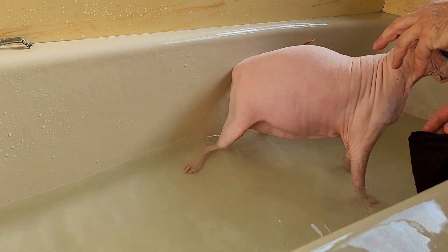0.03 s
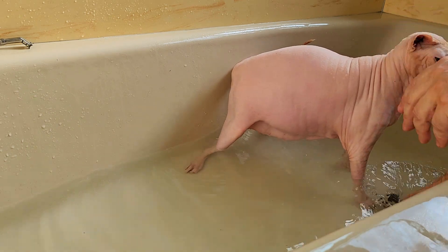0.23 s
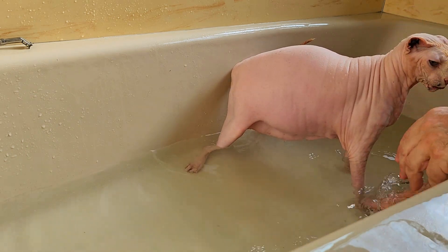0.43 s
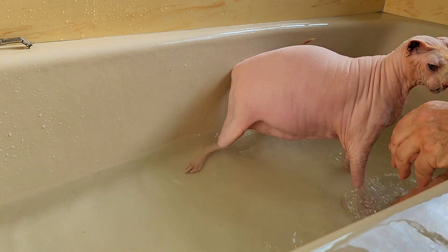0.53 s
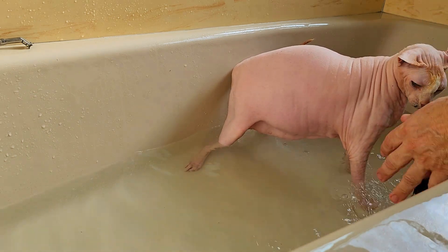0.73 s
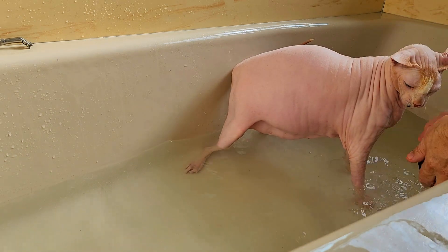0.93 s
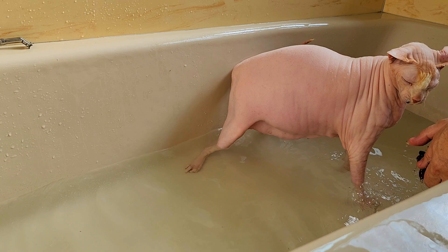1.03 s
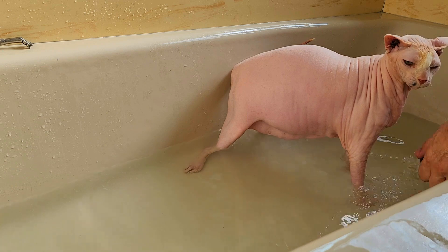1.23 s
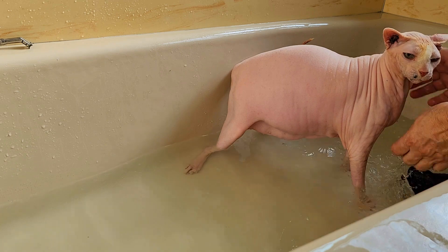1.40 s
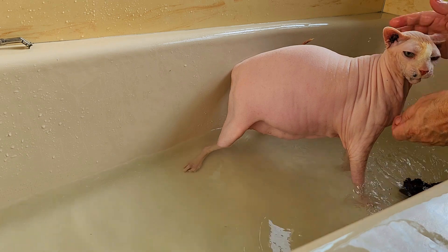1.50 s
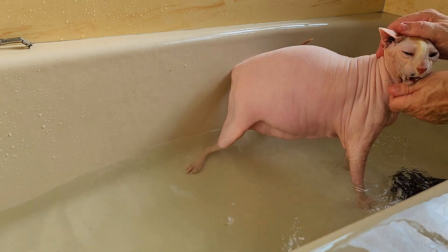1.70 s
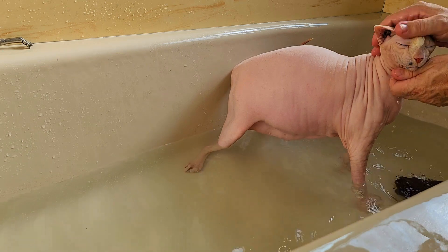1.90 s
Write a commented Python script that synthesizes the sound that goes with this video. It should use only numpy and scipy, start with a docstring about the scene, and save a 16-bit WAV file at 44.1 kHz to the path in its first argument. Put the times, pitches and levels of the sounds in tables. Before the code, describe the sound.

Close stereo pickup of shallow water in a bathtub: small drips and spray, a busy bubbling slosh, scattered drops, a second short bright splash, then near quiet with bathroom echo and low room rumble.

```python
"""A faint plop and a wisp of spray come first, over a low room rumble, as a hand and a cat's legs
stir shallow bathwater close by. Spray is tiny pings and hiss; drops are short bursts of noise.
Big air pockets plop and glug as dying tones with a climbing pitch, and small bubbles swarm the same way.
The tub booms softly in low tones, and echoes made of fading noise give the small hard bathroom."""
import sys
import numpy as np
from scipy import signal
from scipy.fft import rfft, irfft
from scipy.io import wavfile
from scipy.ndimage import uniform_filter1d

SR = 44100
rng = np.random.default_rng(int(sys.argv[2]) if len(sys.argv) > 2 else 0)


def wav_out(sig):
    """Save sig, one row per channel (or a flat mono array), as 16-bit PCM at SR to the path in sys.argv[1]."""
    wavfile.write(sys.argv[1], SR, np.round(np.clip(np.atleast_2d(sig).T, -1, 1) * 32767).astype(np.int16))


N = 85995
TIME = np.arange(N) / SR

# Steady room sound, relative levels: [f/Hz, level/dB]
FLOOR_SPECTRUM = [(15, -49), (30, -32), (43, -4.5), (55, -13), (78, -2), (115, -11), (165, -13),
                  (220, -23.5), (500, -22.5), (2000, -33.5), (5000, -45), (8000, -37), (11000, -44.5),
                  (16000, -33)]
# How alike the room sound is on the two sides: [f/Hz, likeness from -1 to 1]
FLOOR_LIKENESS = [(30, .99), (110, 0.99), (300, 1), (1000, 0.067), (16000, 0.45)]
FLOOR_DB = -52.5  # average (rms) level

# Large air pockets: [t/s, f/Hz at the start, peak level/dB before the scene's trim,
# time to fall 60 dB/s, lean/dB (plus is left)]
BIG_BUBBLES = [(0.0, 400, -45, 0.21, 2), (.347, 613, -36.5, 0.015, 0), (.36, 569, -39, 0.018, -11),
               (0.433, 352, -35.5, 0.082, 8.5), (0.465, 315, -32.5, 0.03, 4), (0.485, 323, -29, 0.029, 0),
               (.491, 1260, -19, 0.028, 1), (0.491, 1490, -23, 0.035, -9), (0.508, 444.2, -24, .1, 3),
               (.553, 462, -36, 0.21, -2), (.566, 2253, -19.5, 0.016, 9.5), (.6, 1443, -22.5, 0.03, 8.5),
               (.642, 1290, -31, 0.016, -6), (0.677, 350, -22.5, 0.073, 1),
               (.691, 377.2, -26.5, 0.098, 2.5), (.707, 409, -24.5, 0.099, 6.5), (.733, 383, -27, 0.11, -6),
               (.775, 421.4, -20, 0.056, 3.5), (.795, 383, -22, 0.068, -1), (0.836, 408, -25, 0.042, -3),
               (.865, 386, -29.5, 0.12, 0), (.882, 410, -54.5, .07, 0), (0.878, 1566, -29.5, 0.013, -10),
               (0.912, 1458, -32.5, 0.036, -4), (.93, 411, -44.5, 0.062, -13), (.952, 410, -50, .06, 0),
               (0.956, 1387, -33.5, 0.023, 11), (1.034, 1660, -28, 0.027, -5),
               (1.139, 1072, -31.5, 0.023, 5), (1.171, 2050, -27, 0.019, -2), (1.388, 2150, -26, 0.0087, 9),
               (1.398, 2010, -18, 0.0066, 0), (1.393, 735.4, -38, 0.36, -3), (1.451, 508, -20, 0.018, -2),
               (1.471, 2147, -13.5, 0.012, 0.5), (1.476, 2330, -34, 0.021, -4),
               (1.480, 640, -26, 0.013, -5), (1.497, 463, -31, 0.099, 6.5), (1.514, 460, -36.5, 0.086, 0),
               (1.582, 825, -29, 0.018, -1), (1.777, 2340, -43.5, 0.01, 13),
               (1.803, 2030, -49.5, 0.045, -24)]
BUBBLE_ATTACK_CYCLES = 2.26
PITCH_RISE = 0.033  # share by which the pitch climbs during the 60 dB fall
LEFT_LEAD_S = 0.00026  # big bubbles are heard on the left first

# Strokes that throw spray: [t/s, swell/s, time to fall 20 dB/s, level/dB before the stroke's shape
# and the scene's trim, brightness/dB per octave]
SPRAY_STROKES = [(0.0, 0.001, .06, -48, -3), (.106, 0.018, 0.54, -49, 1), (0.201, 0.0058, 0.067, -38, 4),
                 (0.369, 0.021, 0.17, -38.5, -5.5), (0.501, 0.042, .1, -39.5, -5),
                 (0.591, .11, 0.15, -42, -3), (0.781, 0.037, 0.36, -49.5, -1),
                 (.93, 0.12, 0.31, -41.5, -0.5), (1.121, 0.1, 0.034, -40.5, -0.5),
                 (1.22, 0.0092, 0.25, -35, -1), (1.385, 0.0013, 0.079, -28.5, 6),
                 (1.41, 0.043, 0.21, -38, -3.5)]
# Tone colour of spray and drops, before brightness: [f/Hz, level/dB]
SPRAY_SPECTRUM = [(150, -21), (300, -5), (600, 0), (2000, 0), (4000, 1.5), (6000, 1.5), (7600, 4),
                  (9500, -1.5), (11000, -3.5), (12700, 0), (16000, -3)]
SPRAY_PER_S, SPRAY_SCATTER_DB = 1200, 5  # average droplet count, unevenness of their strength
DROPLET_LOW_HZ, DROPLET_HIGH_HZ, DROPLET_CYCLES = 1920, 16200, 3.6
MIST = 1  # hiss beside the droplets, as a gain
SPRAY_CLUMP_DB, SPRAY_CLUMP_S = 2.2, 0.007
SPRAY_WIDTH = 0.6  # share of left-right difference

# Soft knocks of water on the tub: [t/s, f/Hz, peak level/dB]
TUB_BOOMS = [(0.093, 96.5, -42), (0.212, 152, -51), (0.544, 92, -38.5), (0.601, 145, -37.5),
             (.645, 143, -32.5), (0.681, 113.6, -33.5), (0.732, 116.5, -41), (0.971, 87, -66),
             (1.455, 97, -44)]
BOOM_ATTACK_S, BOOM_T60_S = 0.02, 0.15

# Single drops and slaps: [t/s, level/dB before the cut, filter and fade in drop(), fade to 1/e/s,
# brightness/dB per octave, lean/dB (plus is left)]
SURFACE_DROPS = [(0.1066, -35, 0.0033, 9, 7), (0.2117, -26, 0.0074, -2.9, -1.5),
                 (0.3232, -29, 0.00081, 18, 26), (0.3699, -31.5, 0.0038, -5, 10),
                 (0.414, -18, 0.00088, 23, 3), (.5412, -24, 0.0011, 11, 6),
                 (0.5516, -17.5, 0.0014, -8.5, 4), (0.598, -31, 0.0017, -4, 1.5),
                 (.773, -30.5, 0.00073, 4, 4), (0.929, -44.5, 0.003, -4, -26), (0.941, -32, 0.0015, 7, 11),
                 (0.9628, -26, 0.0014, -1.5, 10.5), (0.974, -40, 0.0014, -4, -3),
                 (.982, -26, 0.0011, 12, 7), (1.0251, -30.5, 0.0019, -2, 8), (1.0457, -37, 0.002, 21, 13),
                 (1.0745, -24, 0.00066, -10, -2), (1.1223, -23, 0.00054, 5, 1), (1.178, -40, 0.00083, 5, 8),
                 (1.1946, -37, 0.00083, 2, 6), (1.2226, -29, 0.0036, -4.5, 0),
                 (1.3885, -25.5, 0.0027, -3, 8), (1.664, -27, 0.00049, -9, 22.5),
                 (1.825, -41, 0.0027, -12.5, -6), (1.879, -75, 0.00074, 47, -6)]
DROP_LOW_HZ = 700

# Swarms of small bubbles: [t/s, swell/s, time to fall 20 dB/s, level/dB before the stroke's shape
# and the scene's trim, centre f/Hz, spread/octaves]
BUBBLE_SWARMS = [(.11, 0.011, 0.16, -47, 1070, 0.97), (.21, .003, 0.054, -30.5, 820, 1.13),
                 (0.367, 0.019, 0.079, -40, 2770, 0.57), (.448, 0.0044, 0.29, -35, 1342, 0.6),
                 (.492, 0.0014, 0.11, -35, 1640, 0.6), (.49, 0.053, 0.34, -34.5, 377, 0.58),
                 (0.563, 0.0034, 0.076, -43, 11600, 0.039), (.58, .02, 0.091, -37, 3680, 0.61),
                 (.60, 0.052, 0.3, -37.5, 1467, 0.646), (0.839, 0.0062, 0.11, -43.5, 3210, 0.071),
                 (.86, 0.14, 0.22, -44.5, 1715, 0.35), (.94, 0.068, 0.14, -48, 3220, 0.2),
                 (1.012, 0.0047, 0.22, -42.5, 755, 0.47), (1.062, 0.0027, 0.11, -37.5, 3300, 0.036),
                 (1.139, 0.092, 0.25, -41, 996, 0.18), (1.17, 0.0015, 0.12, -32.5, 2010, 0.14),
                 (1.219, 0.098, 0.38, -44.5, 2240, 0.49), (1.387, 0.0025, .11, -31, 12800, .08),
                 (1.447, 0.022, 0.092, -32, 982, 0.88), (1.45, 0.0094, 0.17, -43, 2560, 0.51),
                 (1.47, 0.03, 0.27, -37.5, 421, 0.483), (1.61, 0.038, 0.24, -54.5, 4070, 0.21),
                 (1.765, .02, 0.17, -52, 2270, 0.16)]
SWARM_PER_S, SWARM_CYCLES, SWARM_SCATTER_DB = 700, 4.6, 2

# First echoes off the tub walls: [f/Hz, level/dB]
TUB_SPECTRUM = [(80, -33), (220, -37), (400, -17.5), (650, -2), (1200, -6), (4000, 4), (8000, -1.5),
                (15000, -0.5)]
TUB_T60_S = 0.098
# How long the room rings: [f/Hz, time to fall 60 dB/s]
ROOM_RING = [(100, 0.53), (400, 0.67), (1000, 0.53), (2200, 1.0), (5000, 1), (8000, 0.97), (15000, .55)]
# How strongly the room rings: [f/Hz, level/dB]
ROOM_SPECTRUM = [(80, -14), (220, -13), (400, -7.5), (1000, -2.5), (2200, -2.5), (5000, -4), (8000, -4),
                 (15000, -6.5)]
# How alike the echoes are on the two sides: [f/Hz, likeness from -1 (opposite) to 1 (same)]
ROOM_LIKENESS = [(100, 1), (400, 0.23), (1000, 0.49), (2200, -0.12), (4000, -0.35), (8000, 1), (14000, 1)]
ROOM_DELAY_S = 0.024  # time for the room ring to build up
ECHO_BLEND_PER_S = 13  # half-turns of the blend between echo patterns
EDGE_HZ = 15900  # top of the sound's band


def amp(db):
    """Turns decibels into a gain."""
    return 10 ** (np.asarray(db) / 20)


def unit(x):
    """Scales a sound to an average (rms) strength of one."""
    return x / np.sqrt(np.mean(x ** 2) + 1e-20)


def read(points, hz):
    """Reads between the points of a table, with pitch on a log scale."""
    f, value = np.transpose(points)
    return np.interp(np.log(hz + 1), np.log(f + 1), value)


def colour(x, points, tilt_db=0):
    """Filters a sound by a table of levels, tilted about a pivot near 7 kHz."""
    length = x.shape[-1]
    hz = np.fft.rfftfreq(length, 1 / SR)
    level_db = read(points, hz) + tilt_db * np.log2((hz + 100) / 7000)
    return irfft(rfft(x) * amp(level_db), length)


def two_sides(left, other, points, length):
    """Makes a right side that is partly like the left; takes spectra and returns sound."""
    same = np.clip(read(points, np.fft.rfftfreq(length, 1 / SR)), -1, 1)
    right = same * left + np.sqrt(1 - same ** 2) * other
    return irfft(np.array([left, right]), length)


def placed(x, pan_db):
    """Leans a sound to the left (plus) or right (minus)."""
    return x * amp([[pan_db / 2], [-pan_db / 2]])


def add(mix, s, sound):
    """Adds a sound to the stereo mix at a time in seconds."""
    part = mix[:, max(round(s * SR), 0):][:, :sound.shape[-1]]
    part += sound[..., :part.shape[1]]


def surge(swell, fade):
    """Shapes one stroke: it swells, then falls by 20 dB in every fade time."""
    t = np.arange(0, swell + 3 * fade, 1 / SR)
    return np.minimum(t / swell, 1) * 0.1 ** (np.maximum(t - swell, 0) / fade)


def ring(hz, t60, attack, rise):
    """Makes a dying sine with a soft start and a pitch that climbs by a share (rise)."""
    t = np.arange(0, t60 + attack, 1 / SR)
    soft_start = (1 - np.exp(-2.5 * t / attack)) ** 4
    shape = soft_start * np.exp(-np.log(1000) * t / t60)
    turns = hz * (t + rise * t ** 2 / (2 * t60))
    return shape / shape.max() * np.sin(2 * np.pi * turns)


def floor():
    """Low steady rumble and faint hiss of the room: coloured noise."""
    left, other = rfft(rng.standard_normal((2, N)))
    noise = two_sides(left, other, FLOOR_LIKENESS, N)
    return amp(FLOOR_DB) * unit(colour(noise, FLOOR_SPECTRUM))


def bubbles():
    """Large pockets of air plop and glug, each a tone that rises as it dies away."""
    out = np.zeros((2, N))
    for s, hz, db, t60, pan_db in BIG_BUBBLES:
        plop = amp(db) * ring(hz, t60, BUBBLE_ATTACK_CYCLES / hz, PITCH_RISE)
        t = TIME[:len(plop)]
        late_right = np.interp(t - LEFT_LEAD_S, t, plop)
        add(out, s, placed(np.array([plop, late_right]), pan_db))
    return out


def droplets(length, count=40):
    """Tiny droplets ping at random moments and strengths, on a ladder of pitches."""
    out = np.zeros(length)
    for hz in np.geomspace(DROPLET_LOW_HZ, DROPLET_HIGH_HZ, count):
        hit, size, sign = rng.random((3, length))
        strength = amp(-SPRAY_SCATTER_DB * np.log(size + 0.0072))
        train = (hit < SPRAY_PER_S / count / SR) * strength * np.sign(sign - 0.5)
        ping = hz * ring(hz, np.pi * DROPLET_CYCLES / hz, 1 / hz, PITCH_RISE)
        out += np.convolve(train, ping)[:length]
    return unit(out)


def splash(swell, fade, db, tilt_db, pan_db=0.5):
    """Tiny droplets crackle in clumps over a fine mist of hiss, for half a second at most."""
    length = SR // 2
    shape = surge(swell, fade)[:length]
    pings = np.array([droplets(length), droplets(length)])
    spray = pings + MIST * rng.standard_normal((2, length))
    slow_noise = uniform_filter1d(rng.standard_normal(length), round(SPRAY_CLUMP_S * SR))
    clumps = amp(SPRAY_CLUMP_DB * unit(slow_noise))
    mid, side = (clumps * colour(spray, SPRAY_SPECTRUM, tilt_db))[:, :len(shape)]
    stereo = np.array([mid + SPRAY_WIDTH * side, mid - SPRAY_WIDTH * side])
    return placed(amp(db) * shape * unit(stereo), pan_db)


def boom(hz, db):
    """Water knocks softly on the tub: a low, steady-pitched tone that dies away."""
    return amp(db) * ring(hz, BOOM_T60_S, BOOM_ATTACK_S, 0)


def drop(db, fade, tilt_db, pan_db, tick_db=-6):
    """A short noise smack on the surface, with no bass below the cut."""
    tick = unit(colour(rng.standard_normal(2048), SPRAY_SPECTRUM, tilt_db))
    tick = tick * np.exp(-TIME[:len(tick)] / fade)
    no_bass = signal.butter(3, DROP_LOW_HZ, "high", fs=SR, output="sos")
    return placed(amp(db + tick_db) * signal.sosfilt(no_bass, tick), pan_db)


def swarm(swell, fade, db, centre_hz, octaves, width=1.63, rise=0.13, attack_cycles=1.27, count=900):
    """Many small bubbles of scattered pitch, place and strength ring under one stroke."""
    shape = surge(swell, fade)
    out = np.zeros((2, len(shape)))
    draws = rng.random((count, 5))[:int(SWARM_PER_S * len(shape) / SR)]
    for k, (when, size, strength, side, sign) in enumerate(draws):
        shift = octaves * np.log((size + 0.01) / (1.01 - size)) / 2
        hz = min(centre_hz * 2 ** shift, SR / 3)
        pop = ring(hz, np.pi * SWARM_CYCLES / hz, attack_cycles / hz, rise)
        pop = pop * np.sqrt(hz) * amp(-SWARM_SCATTER_DB * np.log(strength + 0.038))
        angle = np.pi / 4 + width * (2 * side - 1)  # radians; sets the left and right gains
        stereo = np.outer([np.cos(angle), np.sin(angle)], pop)
        add(out, (k + when) / SWARM_PER_S, np.sign(sign - 0.5) * stereo)
    return amp(db) * unit(out) * shape


def echoes():
    """Sparse quick echoes between the tub walls, then noise that fades as the room's ring."""
    t = TIME[:SR]
    hits = rng.standard_normal((2, SR)) * (rng.random((2, SR)) < 2500 / SR)
    early = hits * amp(-60 * t / TUB_T60_S) * (t > 0.001)
    early = early / np.linalg.norm(early, axis=1, keepdims=True)
    early = colour(early, TUB_SPECTRUM) * (t < 0.5)
    # split noise into pitch bands, so that each can fade at its own speed
    hz, frame_s, bands = signal.stft(rng.standard_normal((2, SR)), SR, nperseg=256)
    t60 = read(ROOM_RING, hz)[:, None]
    fading = np.exp(-np.log(1000) * frame_s / t60)
    even_energy = np.sqrt(2 * np.log(1000) / (t60 * SR))  # long rings are not louder overall
    bands = bands * fading * even_energy * amp(read(ROOM_SPECTRUM, hz))[:, None]
    late = signal.istft(bands, SR, nperseg=256)[1][:, :SR]
    return early + late * np.minimum(t / ROOM_DELAY_S, 1)


def bathroom(x, count=3):
    """Adds the echoes, blending three random echo patterns in turn so that the ring stays smooth."""
    wet = 0
    for k in range(count):
        share = np.sqrt(2 / count) * np.cos(np.pi * (ECHO_BLEND_PER_S * TIME + k / count))
        wet = wet + signal.fftconvolve(x * share, echoes(), axes=1)[:, :N]
    left, other = rfft(wet, 2 * N)
    return x + two_sides(left, other, ROOM_LIKENESS, 2 * N)[:, :N]


def scene(bubbles_db=-1, swarms_db=-1, spray_db=-1):
    """All the water in the tub, heard in the bathroom."""
    room = floor()
    water = amp(bubbles_db) * bubbles()
    for s, *row in SPRAY_STROKES:
        add(water, s, amp(spray_db) * splash(*row))
    for s, *row in TUB_BOOMS:
        add(water, s, boom(*row))
    for s, *row in SURFACE_DROPS:
        add(water, s, drop(*row))
    for s, *row in BUBBLE_SWARMS:
        add(water, s, amp(swarms_db) * swarm(*row))
    return bathroom(water) + room


def record(dry):
    """Takes away the treble above the top of the band."""
    low_pass = signal.firwin(511, EDGE_HZ, window=("kaiser", 9), fs=SR)
    return signal.oaconvolve(dry, low_pass[None], "same")


dry = scene()
out = record(dry)
wav_out(out)
```